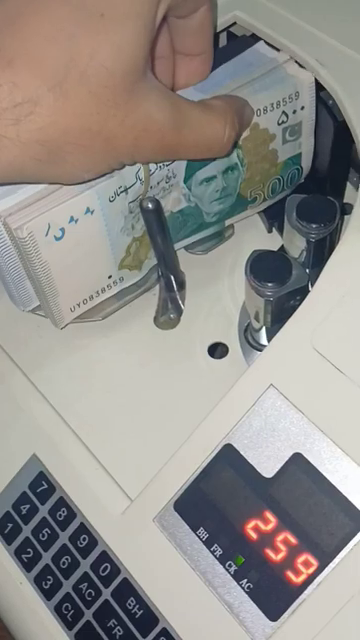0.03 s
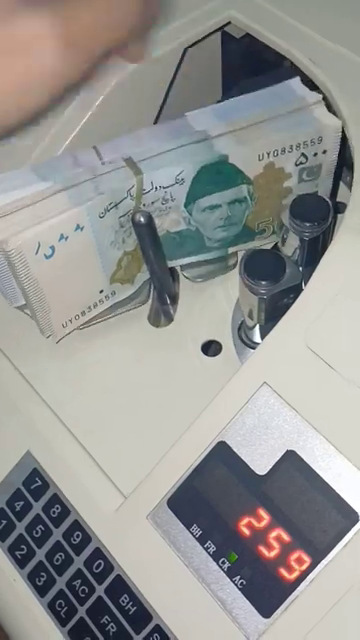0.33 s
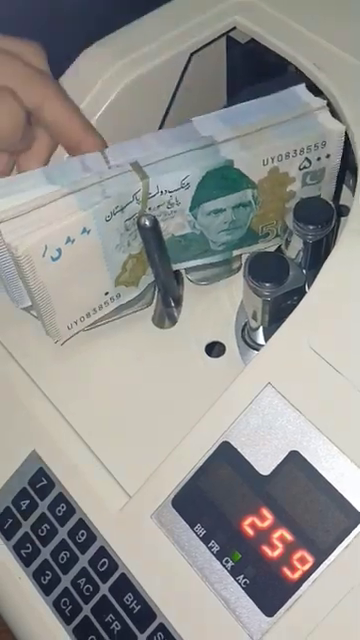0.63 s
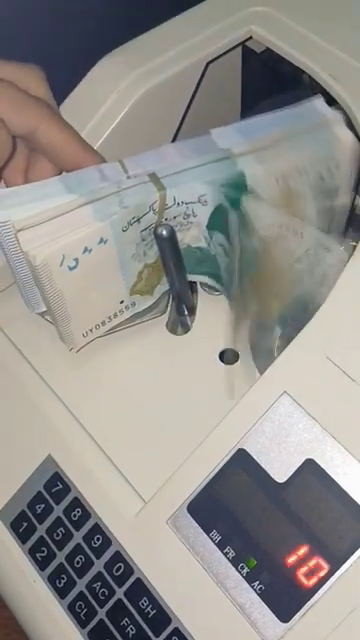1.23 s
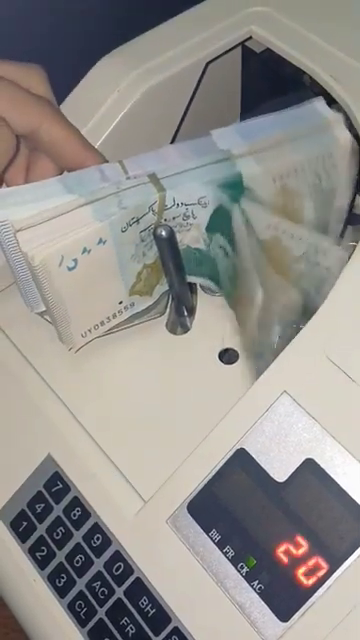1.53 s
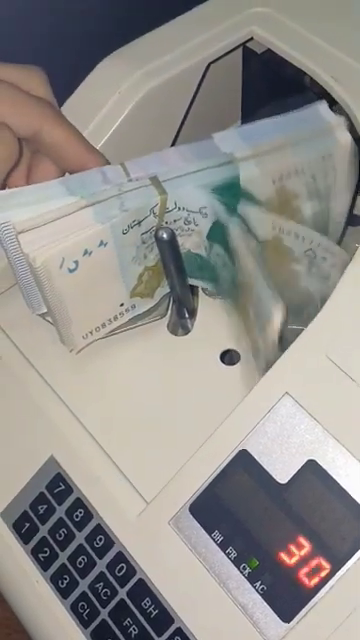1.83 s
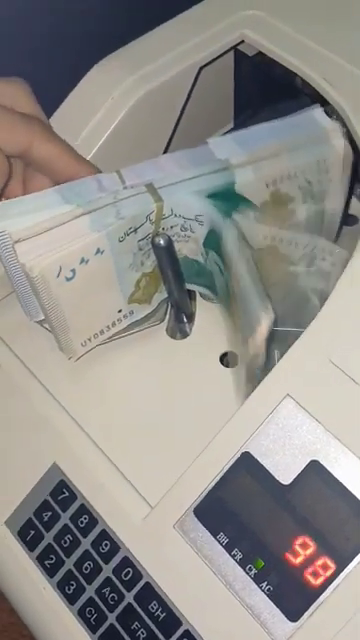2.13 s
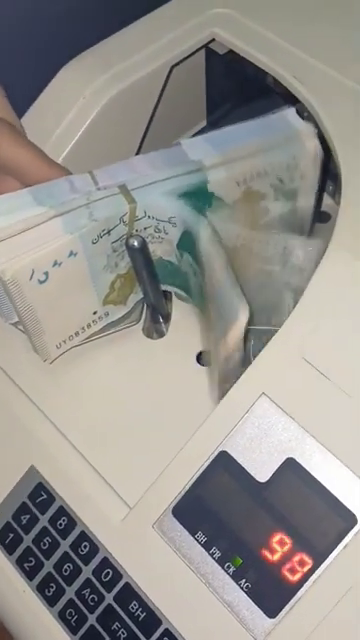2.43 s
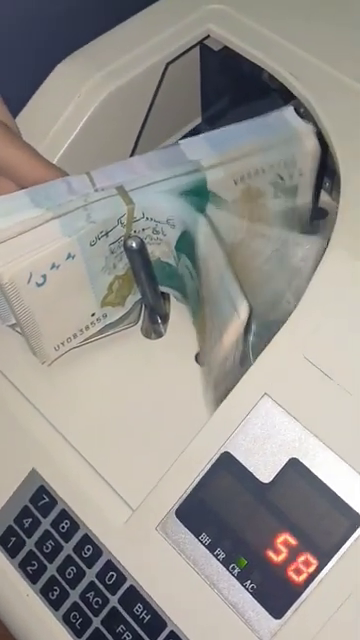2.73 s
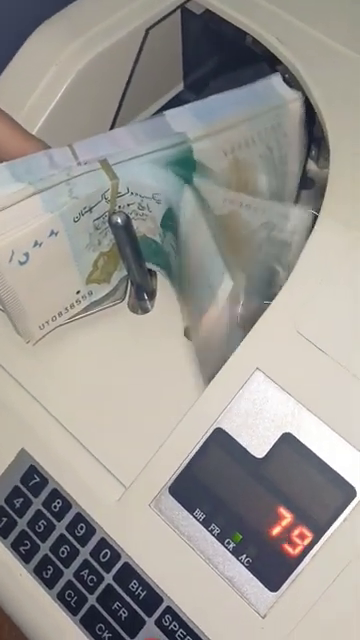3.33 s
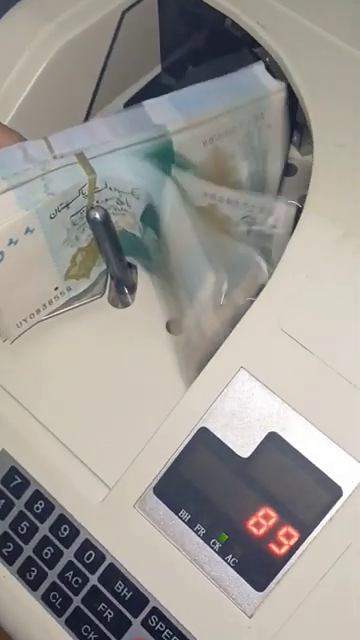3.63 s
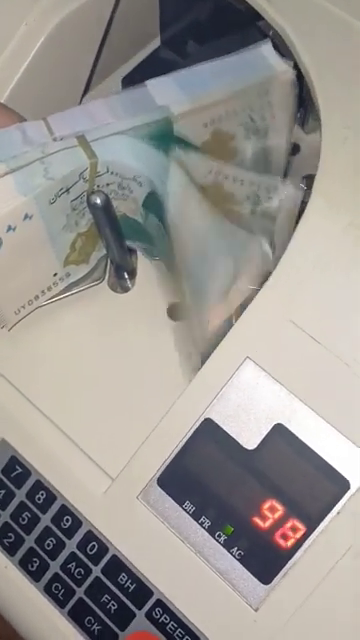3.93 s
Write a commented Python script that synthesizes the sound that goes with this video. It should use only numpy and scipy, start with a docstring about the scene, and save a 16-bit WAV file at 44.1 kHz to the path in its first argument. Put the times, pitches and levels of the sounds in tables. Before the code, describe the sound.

A banknote counter whirs and riffles rapidly through paper after a few handling taps.

```python
"""First come a few dry taps: a hand seats a bundle in a vacuum banknote counter and presses start.
The machine stands on a desk, close to a narrow pair of microphones, in a faintly rumbling room.
The motor grunts, air hisses in until the suction takes hold, and the vane pump whines.
The spindles then flick 33 notes a second: each knocks the case and snaps, over rotor hum and
rustling paper. Now and then a note catches and cracks."""
import sys
import numpy as np
from scipy import signal
from scipy.fft import rfft, irfft, next_fast_len
from scipy.io import wavfile
from scipy.ndimage import map_coordinates

SR = 44100
rng = np.random.default_rng(int(sys.argv[2]) if len(sys.argv) > 2 else 0)


def put_to_file(sound):
    """Save the sound as 16-bit audio at rate SR, in the file named by the first command-line argument."""
    columns = np.atleast_2d(sound).T  # one column per channel
    safe = np.clip(columns, -1, 1)
    whole_steps = np.round(safe * 32767)
    wavfile.write(sys.argv[1], SR, whole_steps.astype(np.int16))


N = 176400
NOTES_PER_S, FIRST_NOTE_S = 32.8, .9881


def amp(db):
    """Decibels to gain."""
    return 10 ** (np.asarray(db) / 20)


def clock():
    """The time of each sample."""
    return np.arange(N) / SR


def along(points, hz):
    """Read (Hz, value) points on a log frequency axis."""
    freqs, values = np.transpose(points)
    return np.interp(np.log(hz + 1), np.log(freqs + 1), values)


def level(rows):
    """(s, dB) points as a gain per sample."""
    return amp(np.interp(clock(), *np.transpose(rows)))


def swell(at_s, width_s):
    """A bell curve in time."""
    return np.exp(-((clock() - at_s) / width_s) ** 2)


def rise(at_s, length_s):
    """A ramp from 0 to 1."""
    return np.clip((clock() - at_s) / length_s, 0, 1)


def fade(t, t60):
    """Decay by 60 dB in t60."""
    return np.exp(-np.log(1000) * t / t60)


def wobble(rate):
    """A smooth random curve, rate knots a second."""
    return map_coordinates(rng.standard_normal(8192), [clock() * rate], mode="mirror")


def filtered(x, response):
    """Shape x by a frequency response."""
    size = next_fast_len(N + 8192)
    return irfft(rfft(x, size) * response(np.fft.rfftfreq(size, 1 / SR)), size)[..., :N]


def strike(times, db, ring):
    """The ring set off at each time with its strength."""
    blows = np.bincount(np.round(np.asarray(times) * SR).astype(int), amp(db), N)[:N]
    return signal.fftconvolve(blows, ring)[:N]


def partials(table, phase, waver_db, blur_rad):
    """Harmonics of a cycle, each a little unsteady in level and phase."""
    tone = 0
    for multiple, db in table:
        gain = np.sqrt(2) * amp(db + waver_db * wobble(12))
        tone += gain * np.sin(multiple * phase + blur_rad * wobble(15) + rng.uniform(0, 2 * np.pi))
    return tone


# Likeness of noise at the two microphones (frequency [Hz], correlation [0-1])
MIC_LIKENESS = [(60, 0.89), (130, 0.86), (480, 0.71), (780, 0.73), (1050, 0.15), (1450, 1), (2800, 0.3),
                (3600, 0.91), (4300, 0.23), (15000, 0.047)]

def noise(spectrum):
    """Coloured stereo noise of rms 1."""
    def mid_and_side(hz):
        angle = np.arccos(np.clip(along(MIC_LIKENESS, hz), 0, 1)) / 2
        return amp(along(spectrum, hz)) * [np.cos(angle), np.sin(angle)]
    mid, side = filtered(rng.standard_normal((2, N)), mid_and_side)
    pair = np.array([mid + side, mid - side])
    return pair / np.sqrt(np.mean(pair ** 2) + 1e-20)


# The room around the desk (frequency [Hz], level [dB])
ROOM_SPECTRUM = [(25, -4), (55, -5), (112, 6.5), (175, -5.5), (270, -5.5), (390, -19), (650, -14),
                 (850, -7.5), (1300, -20), (2500, -26.5), (3800, -34), (15000, -45)]

def room():
    """A faint, steady rumble behind the machine."""
    return amp(-42) * noise(ROOM_SPECTRUM)


# Fingers on the bundle, sliding and scraping (frequency [Hz], level [dB])
SLIDE_SPECTRUM = [(180, -8), (300, 4), (340, -15), (430, -18), (480, -4), (652, -9), (1200, -8.5),
                  (3500, -18), (15500, -32)]
SCRAPE_SPECTRUM = [(500, -8), (1200, -7), (3400, -13), (4600, 10.5), (6000, -11), (7200, 7), (9200, -28),
                   (11000, -1), (15500, -6)]
# Each small scrape (time [s], half-width [s], level [dB])
FINGER_SCRAPES = [(.305, 0.026, -51), (.366, 0.026, -44), (.39, 0.0076, -41.5), (.43, 0.05, -51.5)]

def fingers():
    """Fingers slide off the paper with small, grainy scrapes."""
    slide = amp(-41.5 + 1.7 * wobble(202.6)) * swell(0.35, 0.13) * noise(SLIDE_SPECTRUM)
    strokes = sum(amp(db) * swell(at_s, width_s) for at_s, width_s, db in FINGER_SCRAPES)
    return slide + strokes * amp(-wobble(430)) * noise(SCRAPE_SPECTRUM)


# Taps on the bundle and clunks of the starting mechanism, close by (time [s], click level [dB],
# click t60 [s], click cutoff [Hz], ring frequency [Hz], ring level [dB], ring t60 [s])
TAPS_AND_CLUNKS = [(.137, -27.5, 0.03, 16000, 300, -55, 0.046),
                   (0.181, -33.5, 0.072, 16000, 1088, -30, 0.08),
                   (.2595, -6.5, 0.006, 5460, 1250, -18, 0.011), (.273, -19, 0.019, 16000, 840, -32, 0.03),
                   (0.5312, -18, 0.038, 16000, 934, -30, 0.048), (.537, -18, 0.04, 8900, 763, -16, 0.058),
                   (.541, -30, 0.084, 8000, 861, -32, 0.32), (.56, -30.5, 0.32, 4000, 231, -35, 0.61),
                   (.704, -36, 0.068, 14200, 650, -28, 0.044), (.734, -21.5, 0.037, 16000, 270, -30, 0.18),
                   (.793, -36, 0.052, 8100, 715, -21.5, 0.075)]
# Their click (frequency [Hz], level [dB])
CLICK_SPECTRUM = [(200, -3.5), (900, -7), (2000, -4.5), (3500, -3.5), (5000, -7.5), (7500, -1),
                  (9000, -9.5), (12000, 8.5), (16000, 1.5)]

def taps(tail_db=-24, tail_t60=0.25):
    """Each blow is a dry click with a faint room tail, and one ringing tone."""
    t = np.arange(SR // 2) / SR
    click_noise = noise(CLICK_SPECTRUM)
    sound = 0
    for at_s, db, t60, top_hz, ring_hz, ring_db, ring_t60 in TAPS_AND_CLUNKS:
        envelope = (fade(t, t60) + amp(tail_db) * fade(t, tail_t60)) * (1 - np.exp(-t / 0.0012))
        click = strike([at_s], [db], envelope) * click_noise
        sound += filtered(click, lambda hz: 1 / np.sqrt(1 + (hz / top_hz) ** 10))
        ring = fade(t, ring_t60) * (1 - np.exp(-t / .002)) * np.sin(2 * np.pi * ring_hz * t)
        sound += strike([at_s], [ring_db], ring)
    return sound


# The motor's starting surge (harmonic [x mains buzz], level [dB])
SURGE_HARMONICS = [(1, -1.5), (2, -23), (3, -5.5)]

def motor(buzz_hz=98.7):
    """The motor grunts as it starts, and the mains buzz while it runs."""
    mains = 2 * np.pi * buzz_hz * clock()
    surge = amp(-32) * swell(0.76, 0.074)
    grunt = surge * partials(SURGE_HARMONICS, mains, waver_db=-4.5, blur_rad=0.35)
    buzz = amp(-51) * rise(0.6, .03) * np.sqrt(2) * np.sin(mains)
    return grunt + buzz


# Hum of the rotor (harmonic [x note rate], level [dB])
ROTOR_HARMONICS = [(2, -0.5), (3, -17), (4, -4), (6, -16.5), (10, -10), (11, -19), (13, -13), (14, -14.5),
                   (15, -17), (18, -13), (24, -14)]
# Strength of that hum and of the chassis thump (time [s], level [dB])
ROTOR_LEVEL = [(.85, -55), (1, -37.5), (1.3, -37.5), (2.2, -36.5), (2.9, -30), (4, -29)]

def rotor():
    """The turning rotor hums at multiples of the note rate."""
    phase = 2 * np.pi * NOTES_PER_S * clock()
    return level(ROTOR_LEVEL) * partials(ROTOR_HARMONICS, phase, waver_db=0.5, blur_rad=0.26)


# Whine of the pump (harmonic [x shaft rate], level [dB], onset [s], rise time [s])
PUMP_HARMONICS = [(4, -19.5, 1.1, .1), (8, -12.5, 0.83, 0.21), (12, -6, 0.765, 0.061), (13, -16, 1.16, .1),
                  (14, -17, 0.96, .1), (16, -3.5, 0.79, 0.35), (20, -13, 0.83, 0.083), (24, -20, 0.98, .1)]

def vane_pump(shaft_hz=48.32, sag=0.011, growth_db_per_s=1.4):
    """The whine builds harmonic by harmonic; the shaft slows briefly as it takes up the load."""
    t = clock()
    speed_hz = shaft_hz * (1 - sag * swell(.95, 0.38))
    shaft = 2 * np.pi * np.cumsum(speed_hz) / SR
    whine = sum(partials([(multiple, db)], shaft, waver_db=0.14, blur_rad=0.087) * rise(at_s, rise_s)
                for multiple, db, at_s, rise_s in PUMP_HARMONICS)
    return amp(-30.5 + growth_db_per_s * (t - t.mean())) * whine


# Air drawn past the notes (time [s], level [dB])
INTAKE_LEVEL = [(.7, -80), (.745, -28.5), (.79, -16), (.85, -11.5), (.91, -15.5), (1.1, -18.5),
                (1.3, -25.5), (1.6, -34), (2, -63)]
# Its hiss at close range (frequency [Hz], level [dB])
INTAKE_SPECTRUM = [(300, -7.5), (800, -16.5), (1800, -7.5), (3300, -13), (5300, -3), (6200, -4), (7300, 0),
                   (9000, -9), (10500, -3), (11800, 4), (12800, 3), (14200, -1), (16000, -0.5)]

def intake(flutter_db=1.3):
    """Air hisses in until the notes seal the spindles."""
    return level(INTAKE_LEVEL) * amp(flutter_db * wobble(300)) * noise(INTAKE_SPECTRUM)


def note_times(jitter_s=0.00015):
    """One note is flicked over at each step of the rotor."""
    times = np.arange(FIRST_NOTE_S, N / SR, 1 / NOTES_PER_S)
    return times + jitter_s * rng.standard_normal(len(times))


# Paper passing close to the microphones (time [s], level [dB])
PAPER_LEVEL = [(.7, -81), (.9, -38), (1.3, -28), (1.7, -28.5), (2.2, -29.7), (2.5, -27.5), (2.9, -27),
               (3.5, -26), (4, -25)]
# Its rustle, high fizz and snap (frequency [Hz], level [dB])
RUSTLE_SPECTRUM = [(500, -11), (1500, -10), (2600, -3.5), (3600, -3), (4400, -.5), (7300, -2), (8800, -4.5),
                   (10500, -6), (14000, -4.5), (16000, -4)]
FIZZ_SPECTRUM = [(7000, -26), (10300, -6), (11700, 3.5), (12700, 1), (14000, -0.5), (16000, -1.5)]
SNAP_SPECTRUM = [(400, -11), (1300, -1.5), (3000, 0.5), (5000, 0), (7200, 2.5), (9000, -4), (12000, 0.5),
                 (16000, -1)]

def paper(grain_db=1.14, alternate_db=3.5, scatter_db=2.2, lull_depth=0.42, lull_delay_s=0.0084):
    """Grainy rustle whose fizz lulls after each flick; every second note snaps harder."""
    times = note_times() - .0009  # the snap just leads the knock
    snap_db = 1.5 + alternate_db * (-1) ** np.arange(len(times))
    snap_db += scatter_db * rng.standard_normal(len(times))
    snaps = strike(times, snap_db, fade(np.arange(SR // 8) / SR, t60=0.059)) * noise(SNAP_SPECTRUM)
    cycle = (1 + np.cos(2 * np.pi * NOTES_PER_S * (clock() - FIRST_NOTE_S - lull_delay_s))) / 2
    fizz = amp(2.5 + 0.64 * wobble(24.9)) * (1 - lull_depth * cycle ** 4) * noise(FIZZ_SPECTRUM)
    rustle = amp(grain_db * wobble(1500)) * (noise(RUSTLE_SPECTRUM) + fizz)
    return level(PAPER_LEVEL) * (rustle + snaps)


# Notes that catch (time [s], level [dB])
CAUGHT_NOTES = [(1.688, -14), (2.329, -15), (2.391, -16.5), (2.451, -10.5), (2.634, -17), (2.999, -13),
                (3.061, -15.5), (3.241, -18), (3.609, -17), (3.732, -13), (3.851, -24)]
# Their crack at close range (frequency [Hz], level [dB])
CRACK_SPECTRUM = [(1000, -10), (4000, -25), (7300, 16.0), (9500, -9), (15000, 12.5)]

def cracks():
    """Now and then a note catches on a spindle and lets go with a crack."""
    times, db = np.transpose(CAUGHT_NOTES)
    return strike(times, db, fade(np.arange(SR // 20) / SR, t60=0.019)) * noise(CRACK_SPECTRUM)


# The running mechanism, heard from beside the case (time [s], level [dB])
MECHANISM_LEVEL = [(.72, -34.5), (.8, -25), (.87, -30.5), (1.2, -33), (1.7, -29.5), (2.3, -29),
                   (2.95, -26.5), (3.5, -28), (4, -28)]
# Ring of the case under each note (frequency [Hz], level [dB], t60 [s])
CASE_MODES = [(485, -3, 0.018), (599, 2.5, 0.02), (699, 0.5, 0.014), (826, -8, 0.0038), (1340, -8, 0.02)]
# Loose parts shaking (frequency [Hz], level [dB])
RATTLE_SPECTRUM = [(30, -31), (130, -21), (260, 3), (380, -5), (650, -2), (820, -4), (1050, -8.5),
                   (1400, -7.5), (1900, -12.5), (3500, -21), (8000, -33)]

def knocks(knock_db=8, scatter_db=2, attack_s=0.0011, touch_lead_s=0.00422, touch_db=-8):
    """A spindle touches each note, then flicks it: the case knocks, the chassis thumps, parts shake."""
    t = np.arange(SR // 8) / SR
    times = note_times()

    def mode(hz, t60):
        return fade(t, t60) * (1 - np.exp(-t / attack_s)) * np.cos(2 * np.pi * hz * t)

    def blows(delay_s, db, ring):
        return strike(times + delay_s, db + scatter_db * rng.standard_normal(len(times)), ring)

    def contacts(db, ring):
        return blows(0, db, ring) + blows(-touch_lead_s, db + touch_db, ring)

    case = sum(contacts(knock_db + db, mode(hz, t60)) for hz, db, t60 in CASE_MODES)
    thump = blows(delay_s=0.0027, db=11, ring=mode(hz=246.2, t60=0.077))
    shake = amp(-3.5) * rise(0.681, 0.026) + contacts(db=-4.5, ring=fade(t, t60=0.025))
    rattle = shake * noise(RATTLE_SPECTRUM)
    return level(MECHANISM_LEVEL) * (case + rattle) + level(ROTOR_LEVEL) * thump


# Balance between the microphones (frequency [Hz], left minus right [dB])
MIC_BALANCE = [(60, -1), (200, -4), (400, 2), (700, -5), (1300, -1), (4400, -1), (15000, -2)]

def scene(left_lead_s=.000155):
    """Machine, hand and room at two closely spaced microphones by the desk."""
    machine = motor() + rotor() + vane_pump() + knocks() + paper() + intake() + cracks()
    hand = (taps() + fingers()) * amp([[-1], [1]])  # a little to the right
    sides = np.array([[.5], [-.5]])

    def microphones(hz):
        return amp(sides * along(MIC_BALANCE, hz)) * np.exp(2j * np.pi * hz * left_lead_s * sides)

    return filtered(machine + hand + room(), microphones)


def record(dry, open_s=.114, top_hz=15600):
    """The recorder opens, turns down deep rumble and keeps nothing above its band limit."""
    low_cut = [(20, -16), (50, -0.5)]  # (frequency [Hz], level [dB])
    return rise(open_s, .008) * filtered(dry, lambda hz: (hz < top_hz) * amp(along(low_cut, hz)))


dry = scene()
out = record(dry)
put_to_file(out)
```